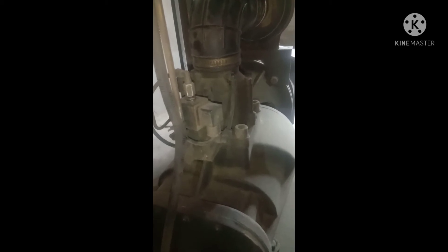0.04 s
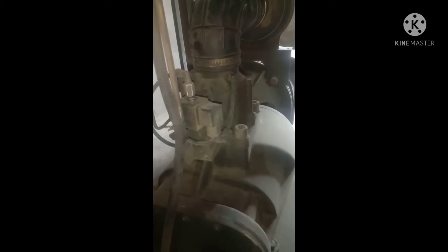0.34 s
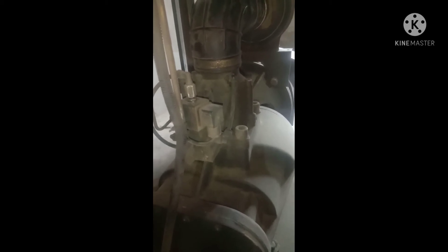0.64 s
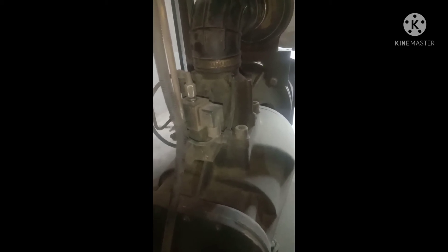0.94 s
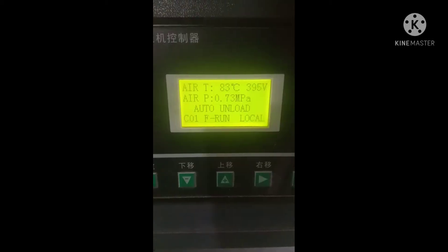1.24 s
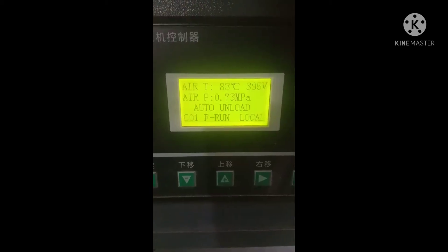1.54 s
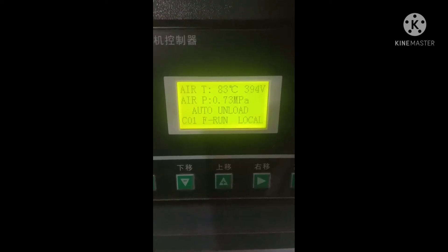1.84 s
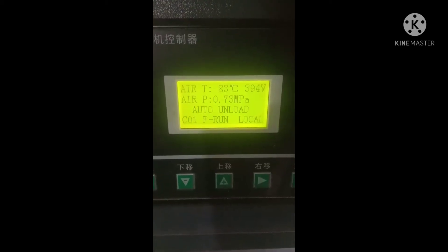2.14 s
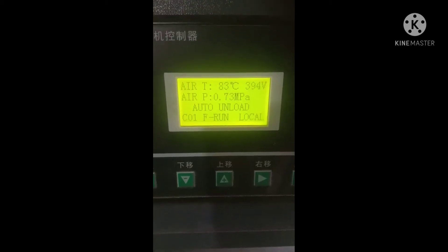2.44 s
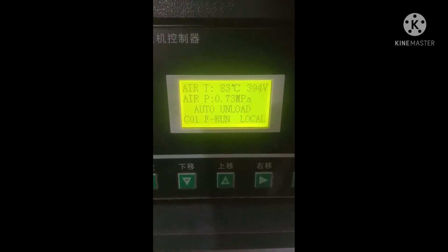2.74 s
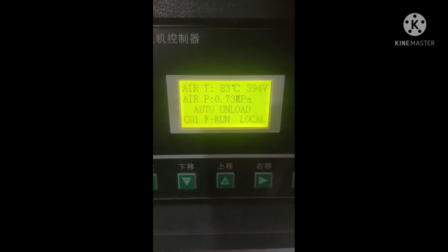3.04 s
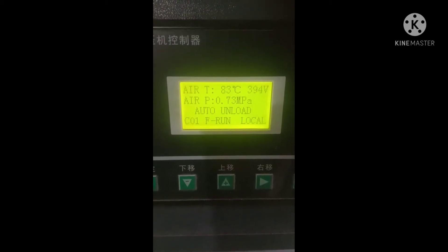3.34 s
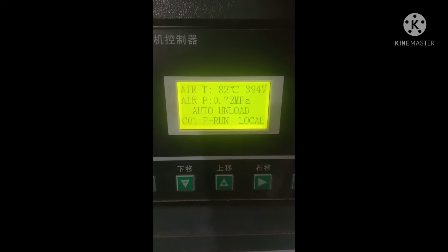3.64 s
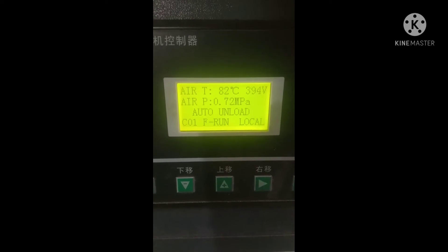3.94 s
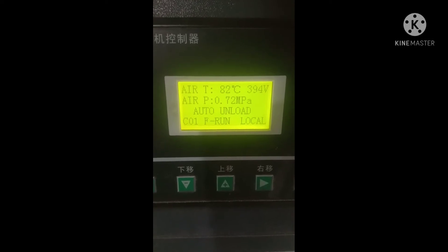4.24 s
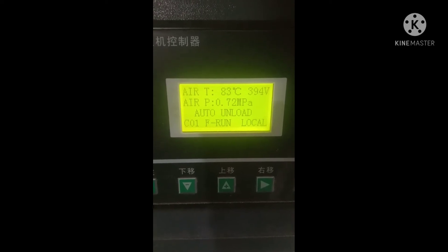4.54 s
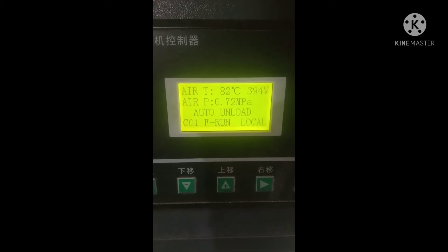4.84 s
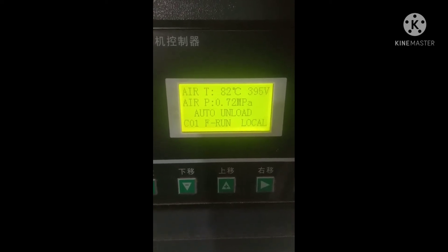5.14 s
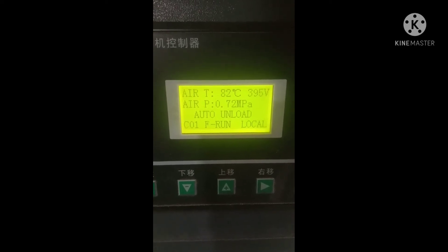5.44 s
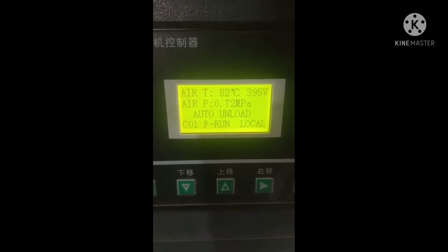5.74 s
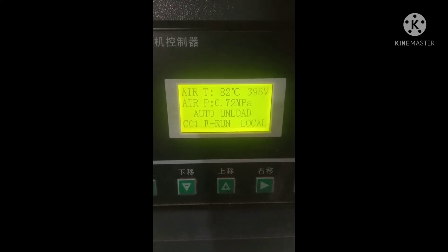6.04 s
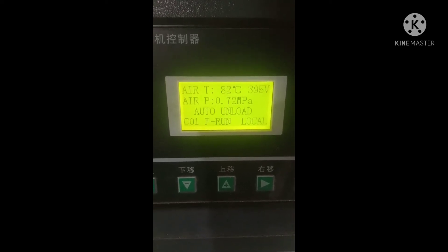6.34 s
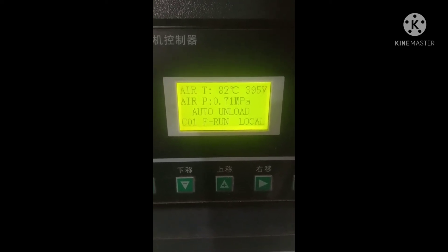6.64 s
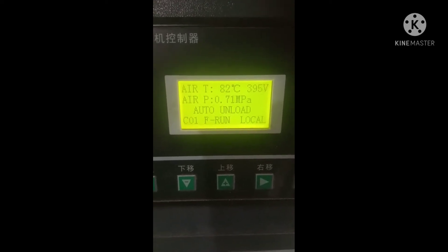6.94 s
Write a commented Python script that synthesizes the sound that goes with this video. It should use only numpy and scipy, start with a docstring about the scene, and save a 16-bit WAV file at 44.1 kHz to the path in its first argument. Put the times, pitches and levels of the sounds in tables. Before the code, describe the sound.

An industrial compressor whines and hisses steadily; after a short silent gap, the whine continues over a droning fan and rumbling cabinet.

```python
"""A piercing, fluttering whine over a steady hum and hiss: a screw air compressor in a plant room.
Beside the open air end the rotors hum, pipes ring in the air stream and the whine flutters with every
shaft turn. After a short fade to silence we listen at the control panel of the closed cabinet, where
the cooling fan drones over rushing air, the sheet metal booms, and the whine throbs before it settles."""
import sys
import numpy as np
from scipy import signal
from scipy.fft import rfft, irfft
from scipy.io import wavfile
from scipy.ndimage import uniform_filter1d, minimum_filter1d

SR = 44100
rng = np.random.default_rng(int(sys.argv[2]) if len(sys.argv) > 2 else 0)


def master_out(mix):
    """Clip the mix to full scale and print it as 16-bit PCM to the path in sys.argv[1]."""
    frames = np.transpose(np.atleast_2d(mix))
    ceiling = np.clip(frames, -1, 1)
    pcm = np.round(ceiling * 32767).astype(np.int16)
    wavfile.write(sys.argv[1], SR, pcm)


N = 313110
T = np.arange(N) / SR

SHAFT_HZ, BLADE_PASS_HZ = 49.92, 120.3
MOVE_S = 1.07  # from air end to panel, hidden in the silence
THROB_PER_S, THROB_CREST_S, SETTLE_S = 5.1, 1.35, 1.9
THROB_DEPTH_DB, THROB_DEPTH_HZ = 1.74, 5.9


def gain_of(db):
    """Decibels to amplitude."""
    return 10 ** (np.asarray(db) / 20)


def unit_power(x):
    """Scales a signal to a mean power of one."""
    return x / np.sqrt(np.mean(abs(x) ** 2) + 1e-20)


def noise_band(width_hz, edge_hz):
    """Complex noise around 0 Hz, shaped as a resonance whose skirts drop steeply beyond the edge."""
    hz = np.fft.fftfreq(N, 1 / SR)
    shape = 1 / np.sqrt((1 + (2 * hz / width_hz) ** 2) * (1 + (hz / edge_hz) ** 6))
    noise = rng.standard_normal(N) + 1j * rng.standard_normal(N)
    return unit_power(np.fft.ifft(shape * noise))


def drift(low_hz, high_hz, count=40):
    """A smooth random wobble of unit power, moving at rates between the two given."""
    t = T[::100]
    hz = np.geomspace(low_hz, high_hz, count) * np.exp(rng.standard_normal(count) / 20)
    waves = np.sin(2 * np.pi * (hz[:, None] * t + rng.random((count, 1))))
    return np.interp(T, t, unit_power(waves.sum(0)))


def shaft_flutter(rows, shaft_turns, lopsided, scatter):
    """Each shaft turn swings the phase of whine and octave; lopsided sidebands shake their level too."""
    step = 10  # samples between control points
    turns = shaft_turns[::step]
    orders, *levels = np.transpose(rows)
    flutters = []
    for level in levels:  # the whine, then its octave
        swing = {k: 2 * np.pi * rng.random() for k in np.unique(abs(orders))}
        sidebands = 0
        for order, db in zip(orders, level):
            phase = np.sign(order) * swing[abs(order)] + lopsided * (2 * rng.random() - 1)
            phase = phase + scatter * drift(0.5, 10)[::step]
            sidebands = sidebands + 1j * gain_of(db) * np.exp(1j * (2 * np.pi * order * turns + phase))
        flutters.append(1 + signal.resample_poly(sidebands, step, 1)[:N])
    return flutters


def whine(curve, flutters, throb, trim_db, octave_trim_db, rasp_db, octave_rasp_db,
          wander_hz, waver_db, octave_waver_db):
    """A high tone and its octave on one restless pitch, each over a rasping skirt of noise."""
    times, *columns = np.transpose(curve)
    hz, tone_db, octave_db = (np.interp(T, times, column) for column in columns)
    cycle = 2 * np.pi * THROB_PER_S * (T - THROB_CREST_S)
    # the pitch falls through each crest of a throb
    hz = hz - throb * THROB_DEPTH_HZ * np.sin(cycle) + wander_hz * drift(3.7, 36)
    carrier = np.exp(2j * np.pi * np.cumsum(hz) / SR)
    tone_db = tone_db + trim_db + throb * THROB_DEPTH_DB * np.cos(cycle) + waver_db * drift(4.5, 18)
    octave_db = octave_db + octave_trim_db + octave_waver_db * drift(4.0, 34)
    tone = gain_of(tone_db) * flutters[0] + gain_of(rasp_db) * noise_band(150, 980)
    octave = gain_of(octave_db) * flutters[1] + gain_of(octave_rasp_db) * noise_band(330, 1090)
    return np.sqrt(2) * (tone * carrier + octave * carrier ** 2).real


def rushing_air(spectrum, flicker_db, ripple_db):
    """Turbulent noise, coloured by standing waves and flickering slightly in level."""
    hz, db = np.transpose(spectrum)
    bins = np.fft.rfftfreq(N, 1 / SR)
    echoes_s = np.geomspace(.001, .012, 24)[:, None]  # each short echo combs the spectrum
    combs = np.cos(2 * np.pi * (echoes_s * bins[::20] + rng.random(echoes_s.shape)))
    ripple = np.interp(bins, bins[::20], unit_power(combs.sum(0)))
    shape = gain_of(np.interp(np.log(bins + 1), np.log(hz), db) + ripple_db * ripple)
    noise = irfft(rfft(rng.standard_normal(N)) * shape, N) * np.sqrt(SR / 2)
    return noise * gain_of(flicker_db * drift(2, 50))


def rotor_hum(rows, cycles, waver_db):
    """Harmonics of a turning part, each wavering in the moving air."""
    hum = 0
    for order, db in rows:
        gain = gain_of(db + waver_db * drift(0.487, 12))
        hum = hum + gain * np.sin(2 * np.pi * (round(order) * cycles + rng.random()))
    return np.sqrt(2) * hum


def ringing(bands):
    """Narrow, pitched bands of noise, such as resonances kept sounding by turbulence."""
    ring = 0
    for hz, width_hz, db in bands:
        band = noise_band(width_hz, 2 * width_hz) * np.exp(2j * np.pi * hz * T)
        ring = ring + gain_of(db) * band.real
    return np.sqrt(2) * ring


def air_end(shaft_turns):
    """Close to the rotors: the full whine, bright hiss, strong lobe hum and ringing pipes."""
    # The whine's path. Each row: time in seconds, pitch in Hz, tone and octave levels in dB before trim.
    whine_curve = [(0.0, 3977, -19.8, -9), (0.07, 3986.3, -19.5, -15.5), (0.12, 3993, -20, -9),
                   (0.3, 3990.8, -19.1, -11.4), (0.68, 3985.3, -20, -13), (0.74, 3993, -20, -8.7),
                   (0.82, 3984.0, -21.5, -12.5), (0.9, 3990, -19.5, -10)]
    # Flutter sidebands. Each row: offset in shaft orders, dB against the tone, dB against its octave.
    sidebands = [(-8, -29, -23), (-5, -31, -22), (-4, -26, -22), (-3, -21, -34), (-2, -16, -16),
                 (-1, -22, -21), (1, -21, -14), (2, -24, -21), (3, -23, -28), (4, -15, -14), (5, -26, -31),
                 (7, -27, -28), (8, -17, -31)]
    # The rush of air and the hiss in the pipework. Each row: frequency in Hz, level in dB per Hz.
    rush_spectrum = [(30, -89), (80, -64.5), (120, -61), (170, -64), (270, -63), (340, -55), (450, -63.5),
                     (720, -66.5), (1150, -66.5), (1400, -71), (2700, -75.5), (3100, -67), (3400, -71.5),
                     (5400, -70.5), (8000, -97)]
    hiss_spectrum = [(4500, -100), (6000, -66), (7000, -62.5), (9000, -68.5), (10600, -76.5),
                     (11900, -72.5), (13300, -82.5), (14300, -72.5), (15300, -71)]
    # Rotor hum, strongest at multiples of the four lobes. Each row: shaft order, level in dB.
    hum_harmonics = [(4, -32), (8, -29), (12, -49), (13, -45), (16, -47), (18, -52), (20, -49), (24, -54),
                     (28, -46), (32, -51), (36, -52)]
    # Resonances of pipes and casing. Each row: frequency in Hz, width in Hz, level in dB.
    pipe_modes = [(322.5, 25, -40.5), (3110, 67, -51), (5980, 54, -38.5), (9500, 80, -49),
                  (9700, 98, -44.5), (9900, 70, -44), (12500, 89, -56)]
    flutters = shaft_flutter(sidebands, shaft_turns, lopsided=1.0, scatter=0.13)
    whining = whine(whine_curve, flutters, throb=0, trim_db=1.0, octave_trim_db=0.5, rasp_db=-33.5,
                    octave_rasp_db=-21.5, wander_hz=3.4, waver_db=1.1, octave_waver_db=1.45)
    rush = rushing_air(rush_spectrum, flicker_db=1.2, ripple_db=2.5)
    hiss = rushing_air(hiss_spectrum, flicker_db=-0.6, ripple_db=2.5)
    hum = rotor_hum(hum_harmonics, shaft_turns, waver_db=0.7)
    return whining + rush + hiss + hum + ringing(pipe_modes)


def fan_drone():
    """The cooling fan's passing blades drone on a slightly drifting pitch."""
    # The drone's harmonics. Each row: multiple of the blade rate, level in dB.
    blade_harmonics = [(1, -36.5), (2, -34.5), (3, -43), (4, -48), (5, -52), (8, -53)]
    blade_passes = np.cumsum(BLADE_PASS_HZ + 0.19 * drift(0.303, 4)) / SR
    return rotor_hum(blade_harmonics, blade_passes, waver_db=.5)


def cabinet_boom():
    """The lowest modes of the cabinet rumble unevenly; each boom lifts them in one smooth arch."""
    # The cabinet's lowest modes. Each row: frequency in Hz, width in Hz, relative level in dB.
    low_modes = [(76.4, 6.3, -10.5), (91.8, 3.1, 3)]
    # Deep booms above the rumble. Each row: middle in seconds, length in seconds, crest level in dB.
    booms = [(1.6, 0.34, -28.5), (2.78, .14, -31), (3.843, .14, -31), (4.183, .16, -30), (5.118, .55, -29),
             (6.5, 0.1, -32), (6.74, 0.14, -35), (7.08, .2, -31)]
    bed_db, waver_db = -37.5, 2.5
    rumble = ringing(low_modes)
    # flatten the rumble's own swells so that the booms stand out
    steady = rumble / np.sqrt(uniform_filter1d(rumble ** 2, size=4000) + .05 * np.mean(rumble ** 2))
    power = gain_of(bed_db + waver_db * drift(1.5, 8.6)) ** 2
    for middle_s, length_s, db in booms:
        arch = np.cos(np.pi * np.clip((T - middle_s) / length_s, -.5, .5))
        power = power + (gain_of(db) * arch) ** 2
    return np.sqrt(power) * unit_power(steady)


def control_panel(shaft_turns):
    """In front of the cabinet: the fan and booming sheet metal join in, and the hiss is duller."""
    # The whine's path. Each row: time in seconds, pitch in Hz, tone and octave levels in dB before trim.
    whine_curve = [(1.3, 3973, -19.5, -15.5), (1.6, 3978, -20, -16.5), (1.75, 3977.3, -19, -15),
                   (2.38, 3974, -20, -14.9), (2.46, 3966.7, -18, -19.5), (2.54, 3981, -20, -15),
                   (3.7, 3979, -19.5, -15.5), (4.2, 3978, -19, -16.5), (4.95, 3978, -19, -16.5),
                   (6.95, 3982, -18.5, -16.5), (7.05, 3977.1, -21, -16)]
    # Flutter sidebands. Each row: offset in shaft orders, dB against the tone, dB against its octave.
    sidebands = [(-16, -38, -32), (-12, -31, -26), (-10, -41, -29), (-8, -28, -22), (-7, -33, -29),
                 (-6, -41, -32), (-5, -23, -25), (-4, -27, -21), (-3, -26, -27), (-2, -28, -12),
                 (-1, -21, -25), (1, -21, -22), (2, -27, -22), (3, -30, -31), (4, -22, -17), (5, -26, -12),
                 (6, -36, -17), (7, -25, -27), (8, -26, -25), (9, -34, -22), (10, -34, -27), (11, -37, -27),
                 (12, -34, -27), (16, -34, -30)]
    # Rotor hum through the cabinet. Each row: shaft order, level in dB.
    hum_harmonics = [(4, -42), (8, -38), (12, -45), (17, -54), (20, -45), (28, -58), (34, -58), (36, -60),
                     (40, -56), (44, -59)]
    # The rush of air and the hiss in the pipework. Each row: frequency in Hz, level in dB per Hz.
    rush_spectrum = [(30, -80), (50, -72), (95, -56.5), (145, -54.5), (230, -50.5), (340, -56),
                     (440, -62.5), (550, -61), (680, -66), (850, -62.5), (1350, -68), (1500, -70),
                     (2700, -73.5), (6000, -72.5), (9000, -93)]
    hiss_spectrum = [(5000, -94), (7200, -72), (9400, -81.5), (10300, -82), (12200, -86.5), (13300, -84),
                     (14300, -86), (15400, -77)]
    # Ringing of sheet metal and pipes, plus the whine's faint third harmonic near 11.9 kHz.
    # Each row: frequency in Hz, width in Hz, level in dB.
    ringing_bands = [(176.2, 4.5, -38), (230, 18, -39), (503, 43, -43), (5700, 150, -63), (6510, 100, -46),
                     (9730, 130, -48.5), (11930, 40, -54), (12060, 120, -60), (14200, 70, -71)]
    flutters = shaft_flutter(sidebands, shaft_turns, lopsided=1.25, scatter=.25)
    throb = np.exp(-((T - THROB_CREST_S) / SETTLE_S) ** 2)  # deep at first, then settling
    whining = whine(whine_curve, flutters, throb, trim_db=0.87, octave_trim_db=0.5, rasp_db=-34,
                    octave_rasp_db=-26.0, wander_hz=2.7, waver_db=1.03, octave_waver_db=1.34)
    fan = fan_drone()
    hum = rotor_hum(hum_harmonics, shaft_turns, waver_db=0.5)
    rush = rushing_air(rush_spectrum, flicker_db=.5, ripple_db=1.66)
    hiss = rushing_air(hiss_spectrum, flicker_db=0.5, ripple_db=2.5)
    return whining + fan + hum + rush + hiss + cabinet_boom() + ringing(ringing_bands)


def scene():
    """One steadily running machine, heard from two places in turn."""
    shaft_turns = np.cumsum(SHAFT_HZ + 0.044 * drift(0.3025, 6)) / SR
    return np.where(T < MOVE_S, air_end(shaft_turns), control_panel(shaft_turns))[None]


def record(dry):
    """Fades out and back in, eases down the highest peaks and cuts the top of the treble."""
    # The fade between the two places. Each row: time in seconds, linear gain.
    fade = [(0, 1), (.905, 1), (.95, 0.42), (1, 0.11), (1.002, 0), (1.128, 0), (1.148, 0.28), (1.22, 0.65),
            (1.3, 0.97), (7.1, 0.96)]
    ceiling, cutoff_hz = .97, 15490
    times, gain = np.transpose(fade)
    faded = dry * np.interp(T, times, gain)
    safe_gain = np.minimum(1, ceiling / (abs(faded) + 1e-9))
    limited = faded * uniform_filter1d(minimum_filter1d(safe_gain, size=300), size=300)
    lowpass = signal.firwin(1023, cutoff_hz, window=("kaiser", 9), fs=SR)
    return signal.oaconvolve(limited, lowpass[None], "same")


dry = scene()
out = record(dry)
master_out(out)
```